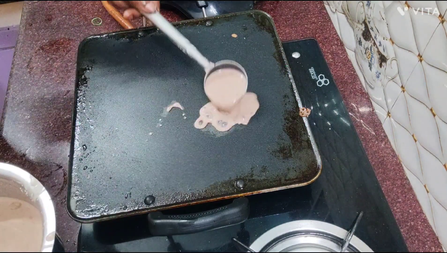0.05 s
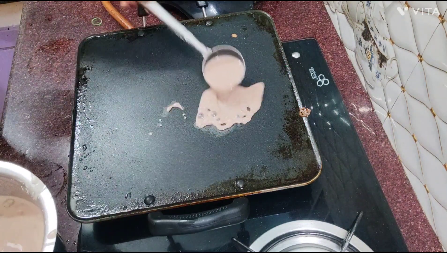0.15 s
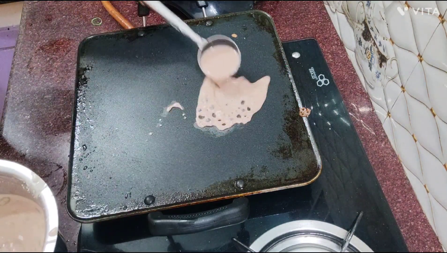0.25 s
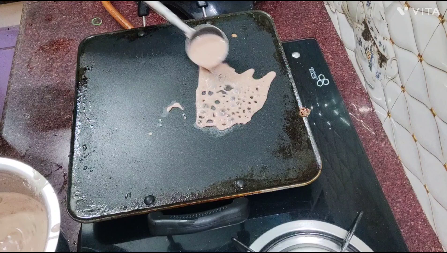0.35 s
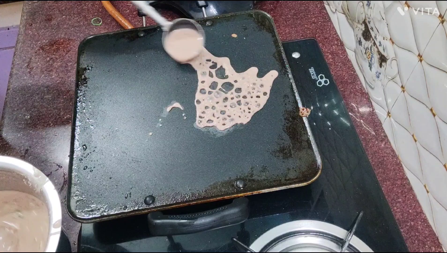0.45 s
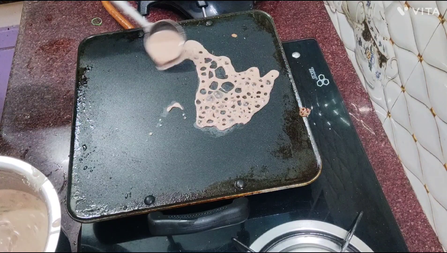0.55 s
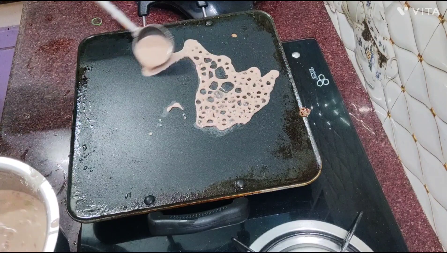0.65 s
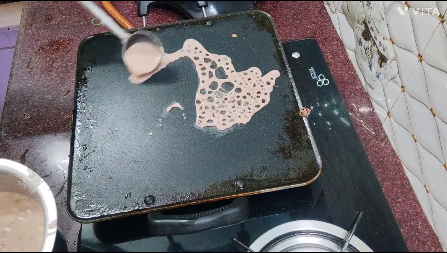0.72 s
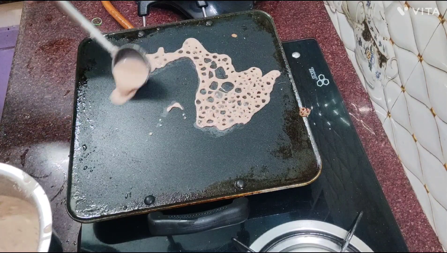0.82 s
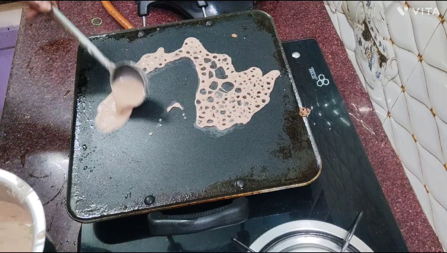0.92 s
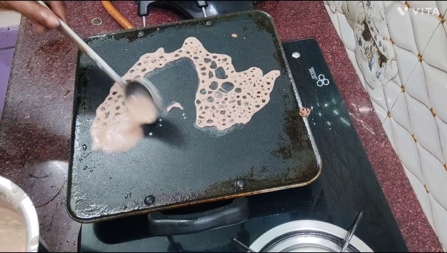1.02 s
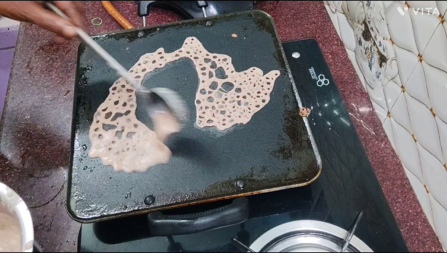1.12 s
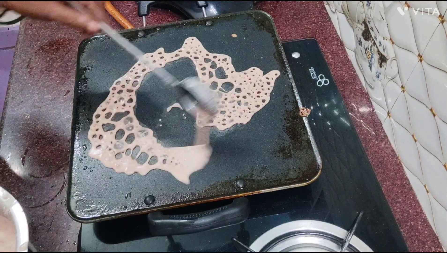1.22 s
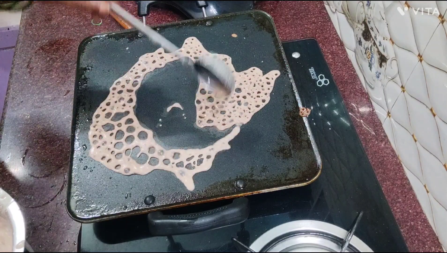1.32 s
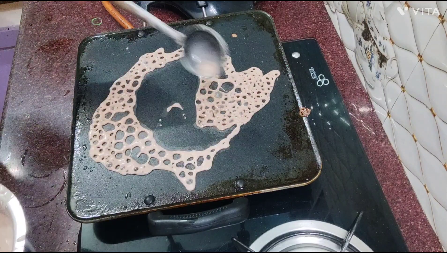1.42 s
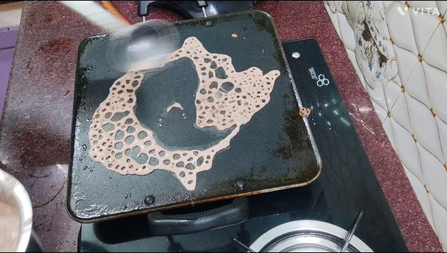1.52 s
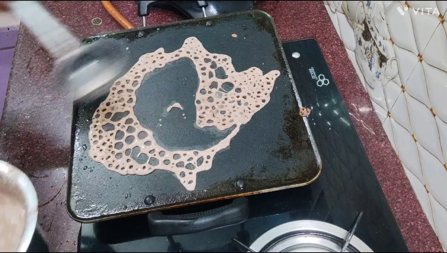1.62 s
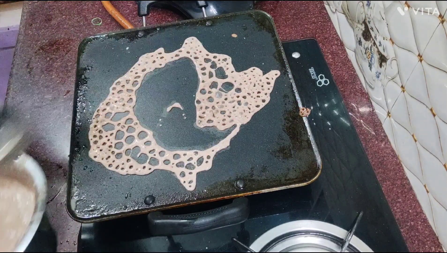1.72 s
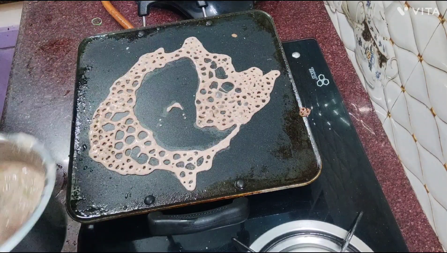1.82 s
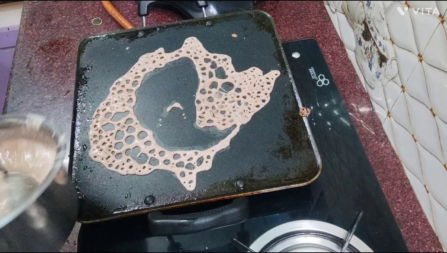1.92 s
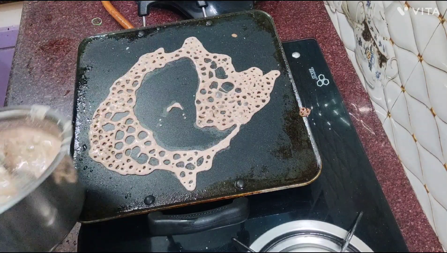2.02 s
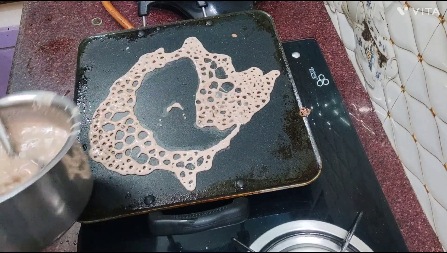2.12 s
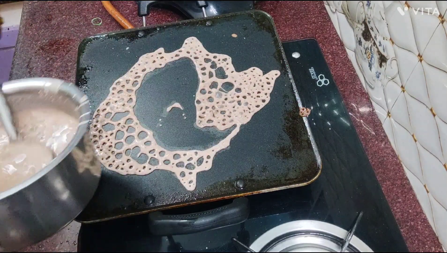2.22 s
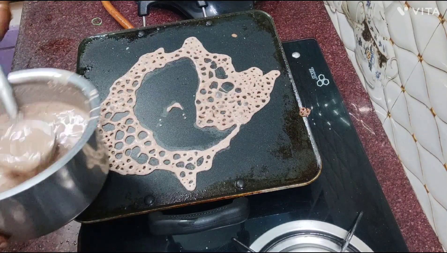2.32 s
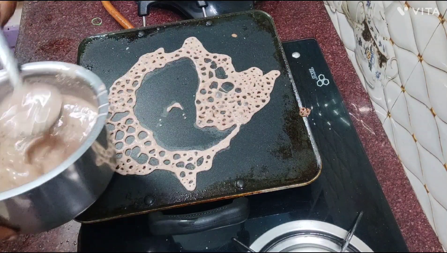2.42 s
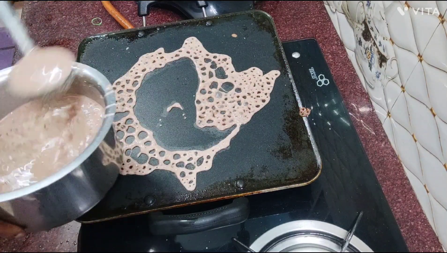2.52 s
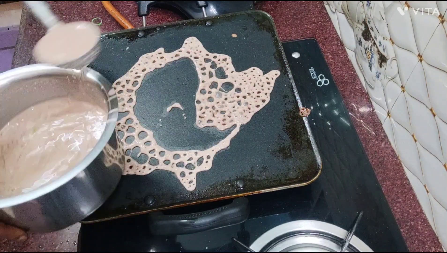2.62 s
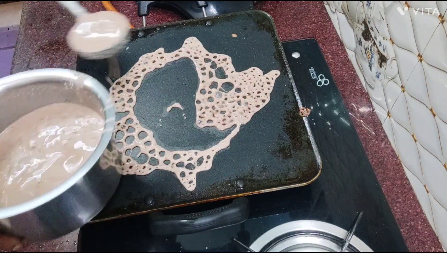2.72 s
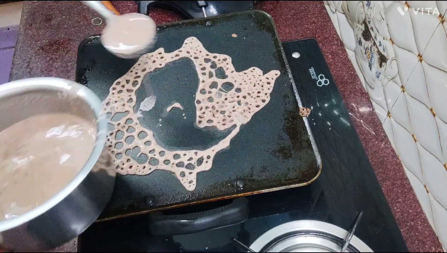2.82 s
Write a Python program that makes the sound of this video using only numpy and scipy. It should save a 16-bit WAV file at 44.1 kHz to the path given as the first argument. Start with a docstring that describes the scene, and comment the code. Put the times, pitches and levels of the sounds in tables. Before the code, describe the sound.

Batter sizzles on a hot griddle, close to a stereo phone in a small kitchen with low steady hum. Nearly quiet at first, the fizz jumps up at 0.1 s and swells; a soft low bump at 0.3 and faint gurgles until 0.6. Bright, dense, fluttering hiss peaks around 1.3-1.5, fades from 1.8 to faint fizz with tiny spits; the ladle dully knocks the bowl twice near 2.2.

```python
"""Thin batter sizzles on a hot griddle in a kitchen, close to a phone, over a low room hum of shaped noise and
wavering tones. Thousands of random clicks a second are its bursting steam bubbles, swelling with the pour and
fading after it; each microphone port rings at its own treble pitch. A few drops spit as short noise cracks.
Early on the phone is bumped once and larger bubbles gurgle; near the end the ladle knocks the bowl twice.
Bump, gurgles and knocks are damped sines."""
import sys
import numpy as np
from scipy import signal
from scipy.fft import rfft, irfft, next_fast_len
from scipy.io import wavfile
from scipy.ndimage import uniform_filter1d, map_coordinates

SR = 44100
rng = np.random.default_rng(int(sys.argv[2]) if len(sys.argv) > 2 else 0)


def log_audio(samples):
    """Write samples as a 16-bit WAV file to the path given in sys.argv[1]."""
    # one column per channel
    frames = np.atleast_2d(samples).T
    # limit to full scale, then quantise
    limited = np.clip(frames, -1, 1)
    pcm = np.round(limited * 32767).astype(np.int16)
    wavfile.write(sys.argv[1], SR, pcm)


N = 125685

HUM_DB, HUM_LEFT_DB = -51, 4  # noise rms before panning; left over right, for noise and tones
TONE_WAVER_HZ, TONE_WAVER_DB = 3.99, 2.5  # scale of the random waver
FIZZ_PER_S, FIZZ_SPREAD_DB = 12000, 4  # clicks per stream at the height of the pour, scatter of sizes
BUBBLES_PER_S, BUBBLE_SPREAD_DB = 9000, 4  # clicks per stream, scatter of sizes
SHARED_FINE, SHARED_COARSE = .56, 0.29  # share of the click power that reaches both ports
THINNING = .3  # dB fewer bursts per dB of softer fizz
SPIT_T60, SPIT_LEFT_DB = .012, 5  # s; left over right
BUMP_S, BUMP_RIGHT_DB = .303, 15  # start; right over left
BUMP_HZ, BUMP_DB, BUMP_T60 = 45, -40, 0.044  # low thud, level before panning, decay in s
BUMP_BODY_HZ, BUMP_BODY_DB = 145, -44.5  # higher body of the bump, level before panning
GURGLE_T60 = 0.093  # s
TOP_HZ = 15500


def amp(db):
    """dB to gain."""
    return 10 ** (np.asarray(db) / 20)


def unit(x):
    """Scaled to rms 1."""
    return x / np.sqrt(np.mean(x ** 2) + 1e-20)


def pan(left_db):
    """Left and right gains that differ by left_db."""
    return amp([[left_db / 2], [-left_db / 2]])


def along(points, hz):
    """Read (frequency, value) points on a log frequency axis."""
    f, v = np.transpose(points)
    return np.interp(np.log(hz + 1), np.log(f + 1), v)


def curves(rows):
    """One value per sample for each column after the time."""
    s, *cols = np.transpose(rows)
    return [np.interp(np.arange(N) / SR, s, c) for c in cols]


def wobble(rate):
    """A smooth random curve with rate knots a second."""
    knots = rng.standard_normal(int(N * rate / SR) + 4)
    return map_coordinates(knots, [np.arange(N) * rate / SR])


def filtered(x, response):
    """x shaped by a response of frequency, padded so that no tail wraps around."""
    m = next_fast_len(N + SR // 2)
    return irfft(rfft(x, m) * response(np.fft.rfftfreq(m, 1 / SR)), m)[..., :N]


def coloured(x, spectrum):
    """Minimum-phase colouring by (frequency, dB) points: nothing sounds ahead of its click."""
    m = 4096
    cep = irfft(np.log(amp(along(spectrum, np.fft.rfftfreq(m, 1 / SR)))), m)
    # folding the cepstrum onto positive time makes the filter causal
    cep[1:m // 2] *= 2
    cep[m // 2 + 1:] = 0
    impulse = irfft(np.exp(rfft(cep)), m)
    return signal.fftconvolve(x, impulse[None], axes=1)[:, :N]


def ring(start_s, hz, db, t60):
    """One damped sine mode from start_s on."""
    t = np.maximum(np.arange(N) / SR - start_s, 0)
    return amp(db - 60 * t / t60) * np.sin(2 * np.pi * hz * t)


def ports(x):
    """The two microphone ports: a shared mean colour, then each port's own ringing treble and phase."""
    # colour of each port: (frequency [Hz], gain [dB])
    left_port = [(300, -1), (1000, -0.5), (3000, 4), (5000, 2.5), (6200, -0.5), (7000, 6.5), (7600, 9),
                 (8050, 8.5), (8500, 12.5), (9200, 15.5), (9600, 5), (10300, -3.5), (12000, -8.5),
                 (15500, -11.5)]
    right_port = [(300, -4.5), (1000, -1), (3000, 5), (5000, 5.5), (6200, 8), (7000, 15), (7700, 20.5),
                  (8100, 16.5), (8400, 13.5), (9000, 9.5), (10200, -1), (12000, -8), (15500, -7.5)]
    # phase of left ahead of right: (frequency [Hz], phase [rad])
    left_leads = [(0, -3), (690, 0.3), (1290, -1.5), (1890, -0.34), (3190, 0.37), (4050, -2.5), (5510, -5),
                  (7750, -6.5), (14900, -7.5), (16100, -1)]

    grid = np.geomspace(100, SR / 2, num=200)
    mean_db = (along(left_port, grid) + along(right_port, grid)) / 2

    def tilt(hz):
        """Half of the difference between the ports, as a complex gain."""
        half_db = (along(left_port, hz) - along(right_port, hz)) / 2
        return amp(half_db) * np.exp(.5j * along(left_leads, hz))

    common = coloured(x, np.column_stack([grid, mean_db]))
    return filtered(common, lambda hz: np.array([tilt(hz), 1 / tilt(hz)]))


def hum():
    """Steady low room noise from mid and side parts, nearly mono around its peak."""
    # noise colour: (frequency [Hz], relative density [dB per Hz])
    hum_colour = [(15, -2.5), (30, -6), (50, -11), (80, -11), (105, -11.5), (133, -0.5), (150, -4.5),
                  (165, -2.5), (230, -6.5), (260, -1), (308, -7), (328, -5.5), (352, -10), (550, -7),
                  (1000, -9), (1600, -17.5), (2600, -90)]
    # left-right likeness: (frequency [Hz], correlation [0..1])
    hum_alike = [(30, .2), (70, 0.33), (130, 1), (250, 0.62), (500, 0.56), (1000, 0.058)]

    def mid_side_gain(hz):
        """A mid/side balance that gives the wanted correlation."""
        turn = np.arccos(np.clip(along(hum_alike, hz), -1, 1)) / 2
        return amp(along(hum_colour, hz)) * [np.cos(turn), np.sin(turn)]

    mid, side = filtered(rng.standard_normal((2, N)), mid_side_gain)
    stereo = unit(np.array([mid + side, mid - side]))
    return amp(HUM_DB) * stereo * pan(HUM_LEFT_DB)


def hum_tones():
    """Narrow sine tones whose pitch and level waver at random."""
    # tones: (frequency before waver [Hz], rms level before waver and panning [dB])
    tone_rows = [(134, -67.5), (327, -65.5)]
    t = np.arange(N) / SR
    tones = np.zeros(N)
    for hz, db in tone_rows:
        phase = 2 * np.pi * (hz * t + np.cumsum(TONE_WAVER_HZ * wobble(8)) / SR)
        level = np.sqrt(2) * amp(db + TONE_WAVER_DB * wobble(5.02))
        tones += level * np.sin(phase)
    return tones * pan(HUM_LEFT_DB)


def bursts(per_s, spread_db, share):
    """Bursting bubbles as random clicks in three streams: one heard by both ports, one by each alone."""
    hit = rng.random((3, N)) < per_s / SR
    size = amp(spread_db * rng.standard_normal((3, N))) * rng.choice([-1, 1], (3, N))
    both, left, right = hit * size
    return np.sqrt(share) * both + np.sqrt(1 - share) * np.array([left, right])


def patchy(x, depth_db):
    """Random gain patches in time and frequency, alike for both ports."""
    z = signal.stft(x, nperseg=256)[2]
    field = rng.standard_normal(z.shape[1:])
    field = uniform_filter1d(field, size=3, axis=0)  # over frequency
    field = uniform_filter1d(field, size=5, axis=1)  # over time
    return signal.istft(z * amp(depth_db * unit(field)), nperseg=256)[1][:, :N]


def sizzle():
    """Fine fizz and coarser bubbling follow the pour and flutter; soft fizz has sparser bursts."""
    # colour of small and of larger bursts: (frequency [Hz], gain [dB])
    fine_colour = [(2000, -20.5), (4500, 0.5), (6000, 0.5), (10000, 3.5), (16000, 2)]
    coarse_colour = [(200, -29.5), (500, -12), (1000, -5.5), (2200, -1.5), (4000, -7.5), (6000, -1.5),
                     (12000, -37)]
    # fine fizz: (time [s], level before flutter and panning [dB], left over right before centring [dB])
    fizz_course = [(0.06, -39, -8), (0.08, -43.5, -12), (0.12, -32.5, -9.5), (0.17, -34.5, -10),
                   (0.26, -30.5, -9.5), (0.46, -28, -9.5), (0.56, -25, -10.5), (0.65, -24, -9),
                   (0.81, -24.5, -10.5), (0.91, -22, -9.5), (0.97, -22.5, -10), (1.06, -23, -8.5),
                   (1.25, -22.5, -9), (1.27, -18.5, -9), (1.29, -22.5, -8.5), (1.34, -21, -9.5),
                   (1.39, -17.5, -8.5), (1.5, -19, -7), (1.62, -20, -7.5), (1.66, -21.5, -9),
                   (1.77, -20, -8), (1.84, -22.5, -8), (1.89, -22, -8.5), (1.94, -25, -8.5),
                   (2.13, -27, -8.5), (2.2, -30, -9), (2.3, -29.5, -9), (2.34, -32, -10),
                   (2.68, -34.5, -8.5), (2.72, -35, -11), (2.8, -34.5, -8.5)]
    # coarser bubbling: (time [s], level before flutter and panning [dB])
    bubbling_course = [(0.06, -52), (0.1, -52.5), (0.13, -41.5), (0.3, -38), (0.67, -32.5), (1.35, -31),
                       (1.38, -28.5), (1.67, -32), (1.72, -34.5), (1.78, -33), (1.88, -36.5), (2.3, -41),
                       (2.7, -44.5), (2.8, -44.5)]

    fizz_db, pan_db = curves(fizz_course)
    coarse_db, = curves(bubbling_course)
    flutter_db = 0.66 * wobble(20) + 0.75 * wobble(45.05) + 0.15 * wobble(150)

    busy = amp(THINNING * (fizz_db - fizz_db.max()))
    clicks = bursts(FIZZ_PER_S * busy, FIZZ_SPREAD_DB, SHARED_FINE) / np.sqrt(busy)  # even power
    fine = unit(ports(coloured(clicks, fine_colour)))
    fine = amp(fizz_db + flutter_db) * patchy(fine, depth_db=1.94)

    clicks = bursts(BUBBLES_PER_S, BUBBLE_SPREAD_DB, SHARED_COARSE)
    coarse = unit(ports(coloured(clicks, coarse_colour)))
    coarse = amp(coarse_db + 0.29 * flutter_db) * patchy(coarse, depth_db=1.48)

    drift_db = (pan_db - pan_db.mean()) / 2  # only the drift: the ports set the mean balance
    return amp([drift_db, -drift_db]) * (fine + coarse)


def spits():
    """Single drops burst as short cracks of decaying random-sign noise."""
    # drops: (time [s], level before colouring and panning [dB])
    drops = [(0.0445, -31), (0.0455, -35), (1.8665, -27), (2.134, -28), (2.2675, -33), (2.377, -36),
             (2.4605, -34), (2.522, -35), (2.7315, -36), (2.8315, -35)]
    # (frequency [Hz], gain [dB])
    spit_colour = [(800, -20), (2500, -5), (6000, 0), (16000, 3)]
    cracks, t = np.zeros((2, N)), np.arange(N) / SR
    for s, db in drops:
        decay = amp(db - 60 * np.abs(t - s) / SPIT_T60) * (t >= s)
        cracks += decay * rng.choice([-1, 1], N)
    return ports(coloured(cracks, spit_colour)) * pan(SPIT_LEFT_DB)


def bump():
    """A soft bump on the phone: a low thud and a longer body of opposite sign, louder on the right."""
    body = ring(BUMP_S, BUMP_BODY_HZ, BUMP_BODY_DB, 2 * BUMP_T60)
    thud = ring(BUMP_S, BUMP_HZ, BUMP_DB, BUMP_T60)
    return (body - thud) * pan(-BUMP_RIGHT_DB)


def gurgles():
    """A few larger bubbles in the pouring batter swell and ring briefly, each a little lower."""
    # bubbles: (time [s], pitch [Hz], level before the onset is softened [dB])
    large_bubbles = [(.33, 930, -51), (.4, 910, -51), (.462, 900, -47), (.515, 880, -46)]
    out = np.zeros(N)
    for s, hz, db in large_bubbles:
        # taking away a faster decay softens the onset
        out += ring(s, hz, db, GURGLE_T60) - ring(s, hz, db, GURGLE_T60 / 4)
    return out


def ladle():
    """The ladle knocks the bowl, whose damped modes ring together."""
    # knocks: (time [s], level [dB])
    knock_rows = [(2.225, -45), (2.252, -50.5)]
    # modes of the bowl: (frequency [Hz], level over the knock's [dB], decay t60 [s])
    bowl_modes = [(560, 0.5, 0.1), (744, 5, 0.042), (990, -3, 0.051)]
    return sum(ring(s, hz, level + db, t60) for s, level in knock_rows for hz, db, t60 in bowl_modes)


def scene():
    """All sources together."""
    return hum() + hum_tones() + sizzle() + spits() + bump() + gurgles() + ladle()


def record(dry):
    """The phone keeps nothing from its band limit upwards."""
    return filtered(dry, lambda hz: hz < TOP_HZ)


dry = scene()
out = record(dry)
log_audio(out)
```